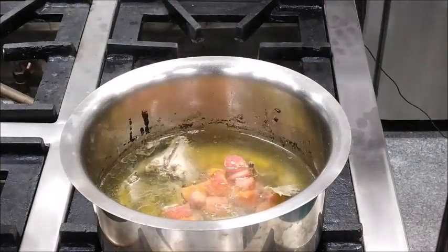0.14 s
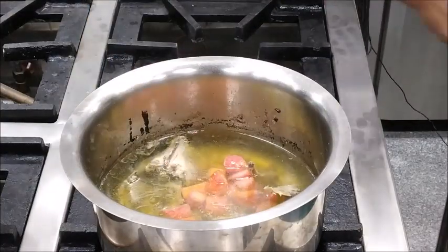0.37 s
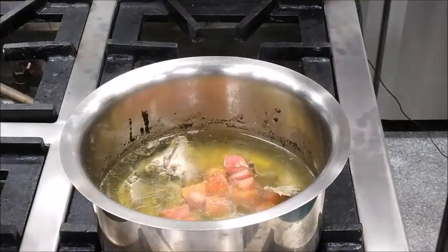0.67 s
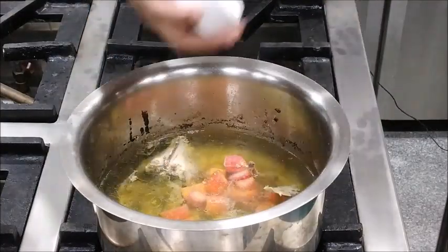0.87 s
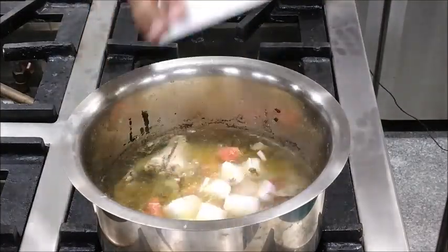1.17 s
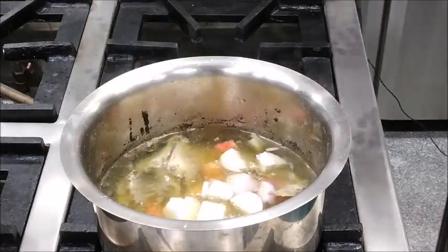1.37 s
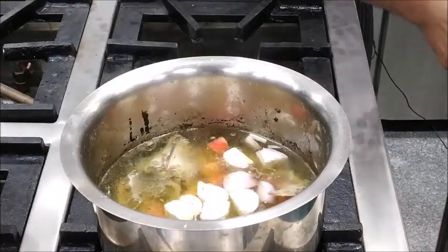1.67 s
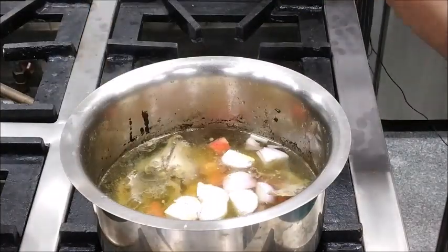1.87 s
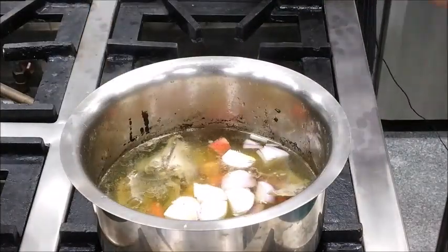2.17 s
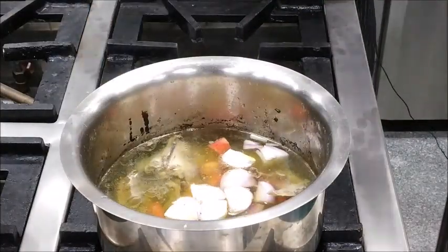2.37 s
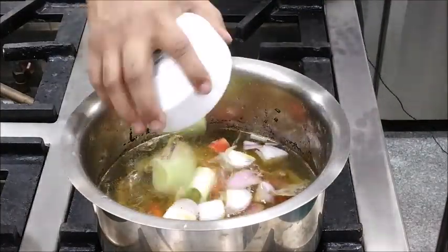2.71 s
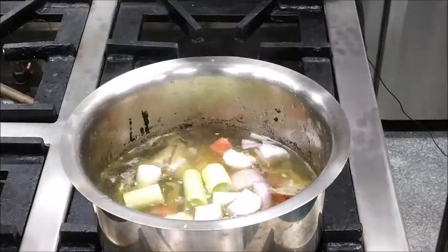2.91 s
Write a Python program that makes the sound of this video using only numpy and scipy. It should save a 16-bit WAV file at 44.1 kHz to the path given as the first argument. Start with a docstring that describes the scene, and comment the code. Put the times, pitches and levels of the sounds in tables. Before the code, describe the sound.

Chopped vegetables plop into a pot of simmering stock in two handfuls, between bowl knocks.

```python
"""A gas burner hisses throughout; a hard knock, most likely an emptied bowl put down, rings the kitchen.
Chopped vegetables then fall into a steel pot of stock: wet cracks, damped sines, spray and trapped bubbles.
A bright clack and a short slide across the counter come before a second bowlful.
The bowls are clicks and scuffs through resonances, the burner and spray are coloured noise and grains,
and the simmer is random bursts ringing the pot; a decaying-noise response gives the room."""
import sys
import numpy as np
from scipy import signal
from scipy.fft import rfft, irfft, next_fast_len
from scipy.io import wavfile
from scipy.ndimage import uniform_filter1d

SR = 44100
rng = np.random.default_rng(int(sys.argv[2]) if len(sys.argv) > 2 else 0)


def generate_wav(sig):
    """Save sig (samples, or channels by samples) to the path in sys.argv[1] as 16-bit PCM at SR."""
    pcm = np.round(np.clip(np.atleast_2d(sig).T, -1, 1) * 32767).astype(np.int16)
    wavfile.write(sys.argv[1], SR, pcm)


N = 134505
T = np.arange(N) / SR  # time in seconds

# Pieces striking the stock. Each row: start in seconds, bright slap level in dB, slap pitch in Hz,
# dull thud level in dB, thud pitch in Hz.
PIECE_IMPACTS = [(1.0762, -26.5, 9200, -26, 980), (1.0882, -43, 13000, -46, 1300),
                 (1.0992, -32, 7950, -42, 1150), (1.1052, -34, 7550, -35, 880),
                 (1.1091, -21, 11100, -29, 930), (1.1116, -20.5, 8500, -35, 900),
                 (1.1136, -28, 12200, -41, 850), (1.155, -32, 9100, -37.5, 740),
                 (1.1612, -24, 12500, -55, 830), (1.172, -33, 6800, -34, 1200),
                 (1.226, -34.5, 7100, -67, 730), (2.7567, -43, 8000, -33.5, 766),
                 (2.7682, -18, 8300, -41, 1200), (2.7897, -38, 11200, -38, 890),
                 (2.8114, -34, 4440, -29.5, 850), (2.8215, -29, 5240, -35, 775),
                 (2.8255, -28.5, 6000, -36, 950), (2.8576, -29, 6830, -48, 470),
                 (2.8607, -23.5, 12600, -54, 800), (2.868, -35, 6070, -55, 900)]
SLAP_CYCLES, THUD_CYCLES = 28, 9.2  # cycles to fall by 60 dB
SLAP_RING_GAIN, CRACK_DB = 0.97, -8.5  # both relative to the slap level
CRACK_T60_S, CRACK_ATTACK_S, THUD_BASS_CUT_HZ = 0.0092, 0.00026, 360
# Colour of the wet crack. Each row: frequency in Hz, level in dB.
CRACK_SPECTRUM = [(60, -28), (300, 8), (900, -14.5), (2000, -17), (3200, -12), (5000, 0.5), (9000, 3),
                  (15000, -2)]

# Swells of spray. Each row: time of the height in seconds, level in dB, 60 dB rise and fall in seconds.
SPRAY_SWELLS = [(1.113, -37, 0.17, 0.13), (1.163, -43, .14, 0.13), (2.772, -45.5, 0.11, 0.15),
                (2.825, -39.5, 0.076, 0.059), (2.866, -48, 0.025, 0.06)]
# Colour of the spray. Each row: frequency in Hz, level in dB.
SPRAY_SPECTRUM = [(60, -39), (300, -24), (900, 9.5), (2000, 3.5), (3200, 1.5), (5000, -5), (9000, -4.5),
                  (15000, 3)]
DROPLETS_PER_S, DROPLET_SPREAD_DB, DROPLET_PAN_SPREAD = 4500, 2.5, 0.8

# Large trapped bubbles. Each row: start in seconds, starting pitch in Hz, level in dB, T60 in seconds.
LARGE_BUBBLES = [(1.12, 860, -41, 0.15), (1.165, 443, -41.5, 0.098), (1.185, 720, -62, .2),
                 (1.222, 355, -49, 0.17), (2.828, 900, -43, 0.12), (2.846, 466, -41.5, 0.22),
                 (2.905, 408, -45.5, 0.076)]
MEAN_PITCH_RISE_PER_S, GULP_ATTACK_S = 0.055, 0.0013  # rise of the pitch averaged since the start
# The stock sloshes and settles. Each row: start in seconds, level in dB, T60 in seconds.
SLOSH_DECAYS = [(1.122, -49.5, 2.06), (2.821, -51.5, 0.9)]
BUBBLES_PER_S, BUBBLE_CYCLES, BUBBLE_LOW_HZ, BUBBLE_HIGH_HZ = 410, 47, 353.6, 1034

# Contacts of the first bowl (dull knock), the second (bright clack and bounce) and the slide with a bump.
# Each row: start in seconds, click level in dB, scuff level in dB, scuff T60 in seconds;
# levels are those of the force, before the colouring below.
KNOCK_CONTACTS = [(.2157, 7.5, -22.5, 0.03), (.2203, 5.5, -23.5, 0.28)]
CLACK_CONTACTS = [(1.8574, 9, -20.5, 0.033), (1.8607, 0, -29, 0.3), (1.9042, -3.5, -28.5, 0.08)]
SLIDE_CONTACTS = [(1.975, -32, -36.5, 0.37), (1.983, -33, -39.5, 0.27), (1.9987, -5, -34, 0.21),
                  (2.024, -28, -38.5, 0.12)]
# Overall colour of each contact as heard, a steep bass cut included.
# Each row: frequency in Hz, level in dB.
KNOCK_SPECTRUM = [(60, -33), (220, -31.5), (310, -14.5), (450, 0), (700, 2), (1200, 1.5), (1900, 0),
                  (3000, 1.5), (5000, -1), (7000, -4.5), (11000, -6), (15500, -6.5)]
CLACK_SPECTRUM = [(60, -16), (220, -27), (310, -20.5), (440, 5.5), (900, 1), (1900, 6), (2700, -3),
                  (4300, 2.5), (6200, -8), (9500, -4.5), (11200, -18.5), (13000, -3.5), (15500, -31)]
SLIDE_SPECTRUM = [(60, -32), (220, -56), (420, -7), (1100, 0.5), (2000, 0), (3000, -1.5), (5000, 1),
                  (7000, -6.5), (9000, -4.5), (11500, -12), (13500, -4.5), (15500, -14)]
# Resonances of each contact. Each row: frequency in Hz, width in Hz, level in dB before this colouring.
KNOCK_RESONANCES = [(520, 45, 5.5), (926, 240, 1.5), (1375, 81, -1), (1740, 65, 3), (2380, 87, -2),
                    (3640, 260, -6.5), (4000, 150, -9), (8700, 110, -10)]
CLACK_RESONANCES = [(509, 31, 3.5), (770, 12, 12), (921, 12, 12), (1454, 31, 7.5), (1883, 40, 2.5),
                    (1960, 52, 5), (2260, 35, -10), (3940, 40, -9), (4200, 70, -25), (7750, 120, 9),
                    (12300, 70, 2), (12640, 310, 17), (14000, 160, 16)]
SLIDE_RESONANCES = [(1180, 120, -2.4), (1920, 50, -2.2), (13800, 500, 0), (15100, 250, 2)]
KNOCK_DIRECT_GAIN, CLACK_DIRECT_GAIN, SLIDE_DIRECT_GAIN = 0.15, 0.43, 0.35
RIGHT_LAG_S = 0.000085  # rounded to whole samples
THUMP_DB, THUMP_HZ, THUMP_CYCLES = -58, 129, 3.3  # the counter under a 0 dB click

# Low wobble after the knock. Each row: time of the height in seconds, level in dB,
# 60 dB rise and fall in seconds.
WOBBLE_SWELLS = [(.39, -47.5, 1, 0.46), (.5, -50, 0.24, 0.62)]
# Resonances of the wobble. Each row: frequency in Hz, width in Hz, level in dB.
WOBBLE_RESONANCES = [(500, 13, -29), (590, 13, 17), (626, 17, 15), (970, 88, 4)]

# Resonances of the pot's hollow. Each row: frequency in Hz, width in Hz, level in dB.
POT_RESONANCES = [(468, 17.3, 4.5), (856, 35, 1.5), (1220, 230, -2), (1910, 53, -0.5)]
SIMMER_PER_S, SIMMER_DB = 110, -64.5

# Colour of the flame. Each row: frequency in Hz, relative level in dB per Hz.
FLAME_SPECTRUM = [(30, -47), (80, -36), (130, -18.5), (190, -29.5), (260, -21), (340, -5.5), (450, 1),
                  (650, -4), (1100, -4), (1900, -2.5), (2300, -7.5), (3200, -12), (6000, -16),
                  (10000, -15.5), (12000, -20.5), (14000, -12.5), (16000, -19)]
# Resonances of the flame. Each row: frequency in Hz, width in Hz, level in dB.
FLAME_RESONANCES = [(469, 48, -5), (820, 150, -0.5), (1227, 94, 3.5), (1806, 20, -1), (1934, 32, -1),
                    (2472, 35, 3), (4395, 58, 6), (7070, 180, -6.5), (9500, 270, -2)]
# Wavering of the burner's treble. Each row: time in seconds, boost in dB.
HISS_BOOST = [(0, 2), (.45, 3.5), (.6, 3), (1, 2), (1.3, 0.5), (1.8, 1), (2.3, 1.5), (2.7, 2), (3.05, 1)]
FLAME_DB, FLICKER_RMS_DB, FLICKER_BELOW_HZ, HISS_ABOVE_HZ = -51, 0.47, 24.3, 2500

# Likeness of left and right in diffuse sound. Each row: frequency in Hz, correlation (no unit).
STEREO_CORRELATION = [(100, 0.6), (450, 0.86), (1000, 0.73), (2000, 0.29), (4000, 0.067), (8000, 0.12),
                      (15000, 0.21)]
# Reverberation of the kitchen. Each row: frequency in Hz, tail T60 in seconds.
ROOM_DECAY = [(100, 0.067), (400, 1), (900, 0.42), (2000, 0.35), (5000, 0.26), (9000, 0.16), (15000, 0.067)]
EARLY_T60_S, EARLY_GAIN, POT_ROOM_DB, ROOM_EVEN_HZ = 0.044, 0.3, -3.5, 110
BASS_CUT_HZ, TOP_CUT_HZ = 120, 15800


def pieces():
    """Impact on a liquid: each piece gives a wet crack of noise, a tiny ring and a dull thud."""
    rings, thuds, cracks = 0, 0, 0
    for s, slap_db, slap_hz, thud_db, thud_hz in PIECE_IMPACTS:
        rings = rings + from_db(slap_db) * ping(s, slap_hz, SLAP_CYCLES)
        thuds = thuds + from_db(thud_db) * ping(s, thud_hz, THUD_CYCLES)
        crack_envelope = decay(s, CRACK_T60_S) - decay(s, CRACK_ATTACK_S)
        cracks = cracks + from_db(slap_db + CRACK_DB) * crack_envelope
    thuds = butterworth(thuds, 2, THUD_BASS_CUT_HZ, "high")
    # one noise shared by both sides, plus diffuse noise
    noise = rng.standard_normal(N) + diffuse_noise(N)
    return SLAP_RING_GAIN * rings + thuds + cracks * rms_one(colour(noise, CRACK_SPECTRUM))


def spray():
    """Random superposition: fine droplets patter all over the pot, each louder on one side or the other."""
    pan = DROPLET_PAN_SPREAD * rng.standard_normal(N) * [[1], [-1]]
    droplets = grains(DROPLETS_PER_S, DROPLET_SPREAD_DB) * (1 + pan)
    return swells(SPRAY_SWELLS) * rms_one(colour(droplets, SPRAY_SPECTRUM))


def bubbles():
    """Bubble resonance: a few large ones ring and rise in pitch; small ones follow as the stock settles."""
    large = 0
    for s, hz, db, t60 in LARGE_BUBBLES:
        age = np.maximum(T - s, 0)
        envelope = decay(s, t60) * (1 - np.exp(-age / GULP_ATTACK_S))
        cycles = hz * age * (1 + MEAN_PITCH_RISE_PER_S * age)
        large = large + from_db(db) * envelope * np.sin(2 * np.pi * cycles)
    pitches = np.geomspace(BUBBLE_LOW_HZ, BUBBLE_HIGH_HZ, 14)
    small = 0
    for hz in pitches:
        starts = grains(BUBBLES_PER_S / len(pitches), 2.5)
        small = small + resonate(starts, [(hz, 2 * hz / BUBBLE_CYCLES, 0)]) / hz
    settling = sum(from_db(db) * decay(s, t60) for s, db, t60 in SLOSH_DECAYS)
    return large + rms_one(small) * settling


def bowl(contacts, spectrum, modes, direct_gain):
    """Forced resonance: clicks and dying scuffs ring the bowl and thump the counter; left hears clicks first."""
    clicks, scuffs, thumps = np.zeros(N), 0, 0
    for s, click_db, scuff_db, t60 in contacts:
        clicks[int(s * SR)] += from_db(click_db)
        scuffs = scuffs + from_db(scuff_db) * decay(s, t60)
        thumps = thumps + from_db(click_db + THUMP_DB) * ping(s, THUMP_HZ, THUMP_CYCLES)
    direct = np.array([clicks, np.roll(clicks, round(RIGHT_LAG_S * SR))])
    force = direct_gain * direct + convolve(clicks, kitchen()) + scuffs * diffuse_noise(N)
    return colour(force + resonate(force, modes), spectrum) + thumps


def wobble():
    """Narrow-band resonance: swelling noise makes a faint hollow murmur after the knock."""
    return swells(WOBBLE_SWELLS) * rms_one(resonate(diffuse_noise(N), WOBBLE_RESONANCES))


def simmer():
    """Impulse excitation: small bubbles burst in the stock all the while and ring the hollow of the pot."""
    rate = SIMMER_PER_S / len(POT_RESONANCES)
    bursts = sum(resonate(grains(rate, 0.67), [mode]) for mode in POT_RESONANCES)
    return from_db(SIMMER_DB) * rms_one(bursts)


def burner():
    """Broad-band flow noise: the gas flame rushes under the pot, flickers slightly and wavers in its hiss."""
    gas = diffuse_noise(N)
    rush = rms_one(colour(gas + resonate(gas, FLAME_RESONANCES), FLAME_SPECTRUM))
    flicker = rms_one(butterworth(rng.standard_normal(N), 2, FLICKER_BELOW_HZ, "low"))
    hiss = butterworth(rush, 1, HISS_ABOVE_HZ, "high")
    hiss_gain = from_db(np.interp(T, *np.transpose(HISS_BOOST)))
    level = from_db(FLAME_DB + FLICKER_RMS_DB * flicker)
    return level * (rush + hiss * (hiss_gain - 1))


def kitchen(size=32768):
    """Reverberation: dense early reflections and a tail with its own decay in each band, even in colour."""
    noise, hz, t = rfft(diffuse_noise(size)), np.fft.rfftfreq(size, 1 / SR), T[:size]
    centres = [f for f, _ in ROOM_DECAY]
    response = 0
    for share, (_, t60) in zip(np.eye(len(centres)), ROOM_DECAY):
        tail = np.exp(-np.log(1000) * t / t60)
        early = EARLY_GAIN * np.exp(-np.log(1000) * t / EARLY_T60_S)
        envelope = tail + early
        band = irfft(noise * np.interp(hz, centres, share))
        response = response + band * envelope / np.linalg.norm(envelope)
    spectrum = rfft(response, 2 * size)
    # divide by the twice-smoothed spectrum to even out the colour
    width = int(ROOM_EVEN_HZ * 2 * size / SR)
    power = uniform_filter1d(np.abs(spectrum) ** 2, width, axis=1)
    power = uniform_filter1d(power, width, axis=1)
    return irfft(spectrum / np.sqrt(power))[:, :size]


def diffuse_noise(size):
    """Diffuse field: white stereo noise whose left-right correlation depends on frequency."""
    mid, side = rfft(rng.standard_normal((2, next_fast_len(size, True))))
    alike = np.clip(at_hz(STEREO_CORRELATION, np.linspace(0, SR / 2, len(mid))), -.99, .99)
    common = np.sqrt((1 + alike) / 2) * mid
    opposed = np.sqrt((1 - alike) / 2) * side * [[1], [-1]]
    return irfft(common + opposed)[:, :size]


def grains(per_s, spread_db):
    """Random point process: clicks of uneven size and either sign."""
    happens = rng.random(N) < per_s / SR
    size_db = spread_db * np.minimum(rng.exponential(1, N), 4)
    return happens * from_db(size_db) * rng.choice([-1, 1], N)


def ping(s, hz, cycles):
    """Damped oscillation: a sine that falls by 60 dB in so many cycles."""
    return decay(s, cycles / hz) * np.sin(2 * np.pi * hz * (T - s))


def decay(start, t60):
    """Exponential decay: an envelope that jumps to 1 and falls by 60 dB in t60 seconds."""
    return (T >= start) * np.exp(-np.log(1000) * np.clip((T - start) / t60, 0, 10))


def swells(rows):
    """Exponential growth and decay: swells that rise to a height and fall again."""
    envelope = 0
    for s, db, rise, fall in rows:
        distance = np.minimum(np.maximum((s - T) / rise, (T - s) / fall), 10)
        envelope = envelope + from_db(db) * np.exp(-np.log(1000) * distance)
    return envelope


def resonate(x, modes):
    """Modal superposition: parallel two-pole resonances, wider ones dying sooner."""
    out = 0
    for hz, width, db in modes:
        r = np.exp(-np.pi * width / SR)
        poles = [1, -2 * r * np.cos(2 * np.pi * hz / SR), r * r]
        gain = from_db(db) * (1 - r * r) / 2
        out = out + gain * signal.lfilter([1, 0, -1], poles, x + 1e-18)
    return out


def colour(x, spectrum, size=4096):
    """Minimum phase: a causal filter built from the given spectrum by folding its cepstrum."""
    level_db = at_hz(spectrum, np.fft.rfftfreq(size, 1 / SR))
    cepstrum = irfft(np.log(from_db(level_db)))
    cepstrum[1:size // 2] *= 2
    cepstrum[size // 2 + 1:] = 0
    return convolve(x, irfft(np.exp(rfft(cepstrum))))


def convolve(x, response):
    """Linear superposition: play a sound through a response, channel by channel."""
    return signal.fftconvolve(np.atleast_2d(x), np.atleast_2d(response), axes=1)[:, :N]


def butterworth(x, order, hz, kind):
    """Frequency selection: a maximally flat high-pass or low-pass filter."""
    return signal.sosfilt(signal.butter(order, hz, kind, fs=SR, output="sos"), x)


def at_hz(points, hz):
    """Logarithmic pitch: read a table on a log-frequency axis."""
    f, v = np.transpose(points)
    return np.interp(np.log(np.maximum(hz, 1)), np.log(f), v)


def from_db(db):
    """Logarithmic level: decibels to amplitude gain."""
    return 10 ** (np.asarray(db) / 20)


def rms_one(x):
    """Mean power: scale to unit rms."""
    return x / np.sqrt(np.mean(x ** 2) + 1e-20)


def scene():
    """Superposition of sources: the pot close by, the bowls further off, the burner throughout."""
    pot = pieces() + spray() + bubbles() + simmer()
    knock = bowl(KNOCK_CONTACTS, KNOCK_SPECTRUM, KNOCK_RESONANCES, KNOCK_DIRECT_GAIN)
    clack = bowl(CLACK_CONTACTS, CLACK_SPECTRUM, CLACK_RESONANCES, CLACK_DIRECT_GAIN)
    slide = bowl(SLIDE_CONTACTS, SLIDE_SPECTRUM, SLIDE_RESONANCES, SLIDE_DIRECT_GAIN)
    pot_in_room = pot + from_db(POT_ROOM_DB) * convolve(pot, kitchen())
    return pot_in_room + knock + clack + slide + wobble() + burner()


def record(dry):
    """Band limiting: the microphone thins the bass; a steep filter cuts the top."""
    thin = butterworth(dry, 1, BASS_CUT_HZ, "high")
    return signal.sosfilt(signal.ellip(10, .2, 75, TOP_CUT_HZ, fs=SR, output="sos"), thin)


dry = scene()
out = record(dry)
generate_wav(out)
```